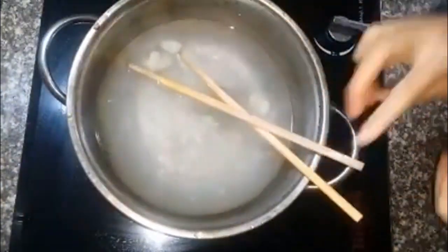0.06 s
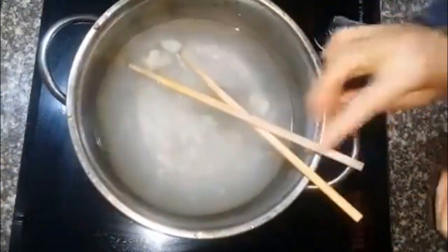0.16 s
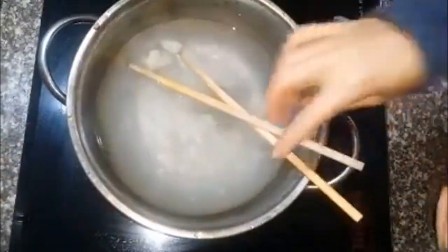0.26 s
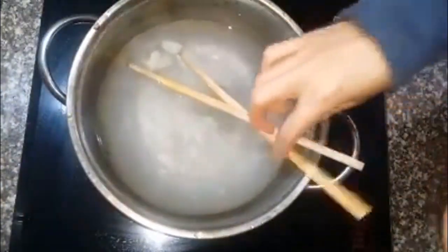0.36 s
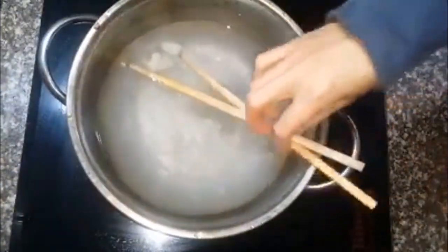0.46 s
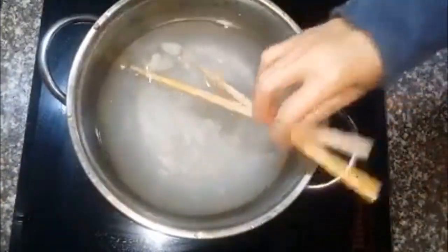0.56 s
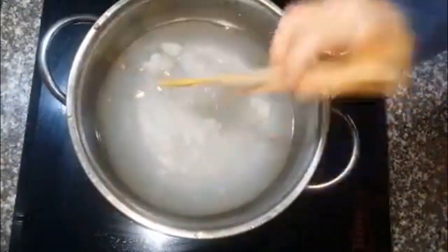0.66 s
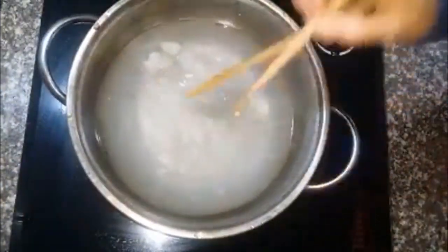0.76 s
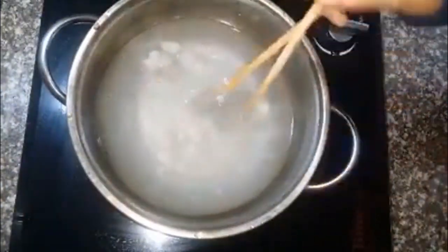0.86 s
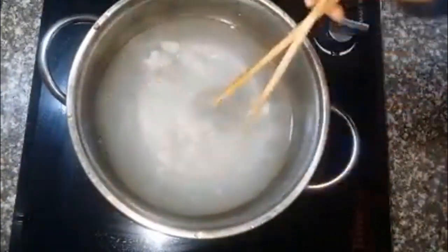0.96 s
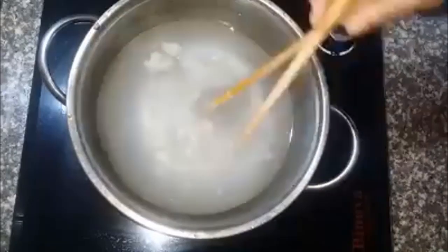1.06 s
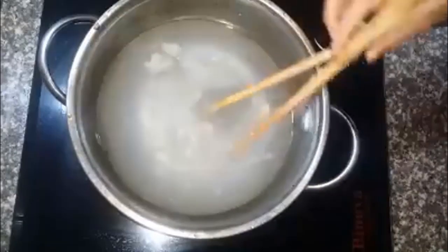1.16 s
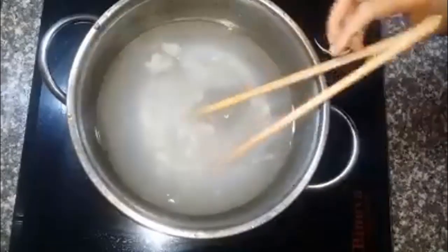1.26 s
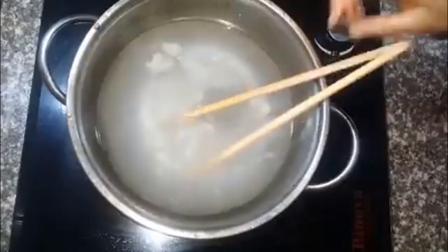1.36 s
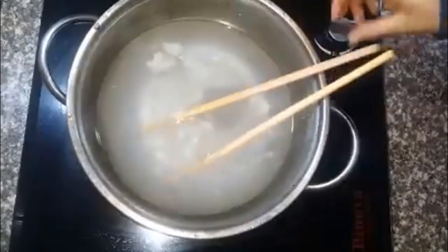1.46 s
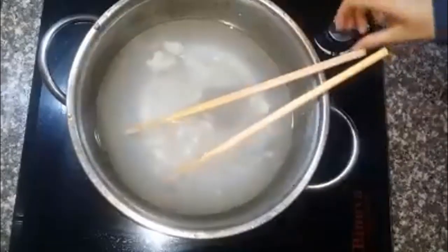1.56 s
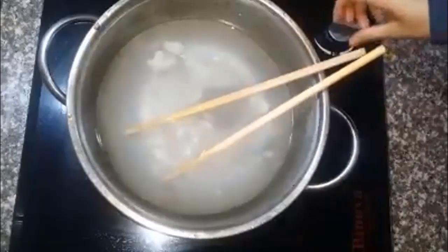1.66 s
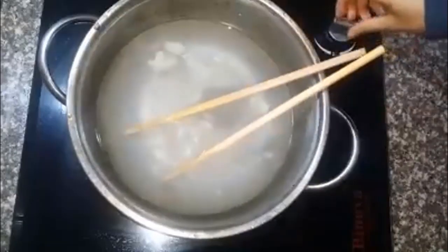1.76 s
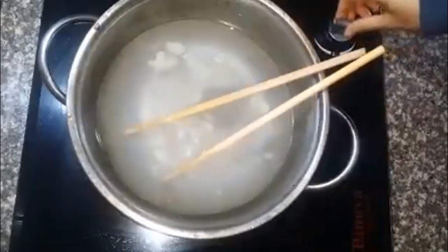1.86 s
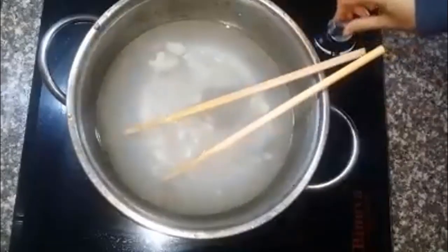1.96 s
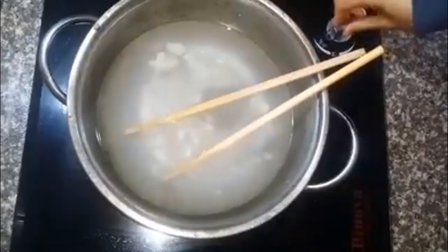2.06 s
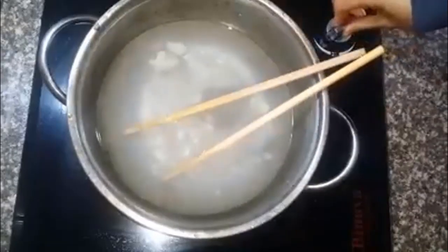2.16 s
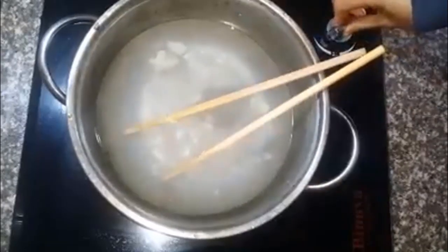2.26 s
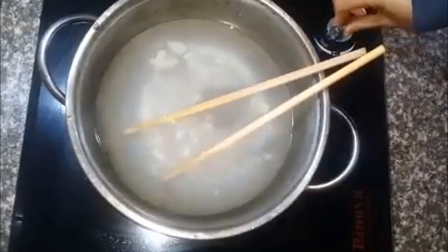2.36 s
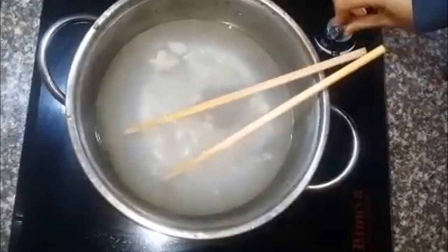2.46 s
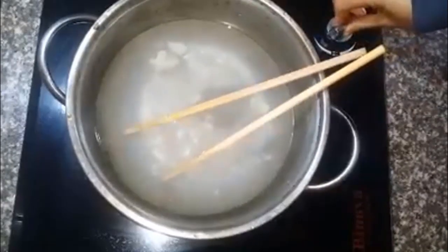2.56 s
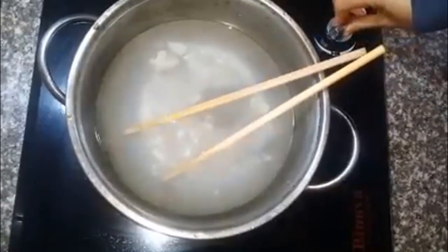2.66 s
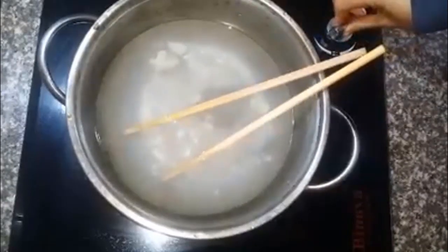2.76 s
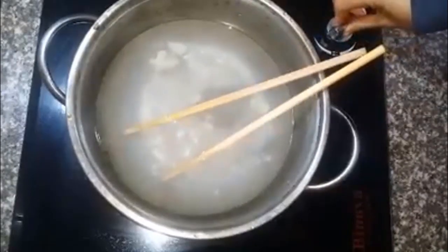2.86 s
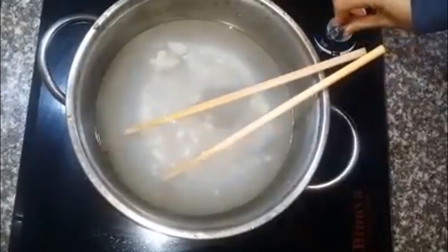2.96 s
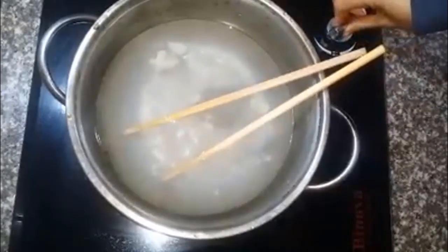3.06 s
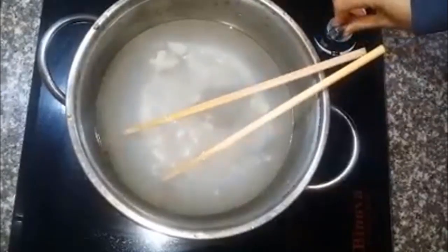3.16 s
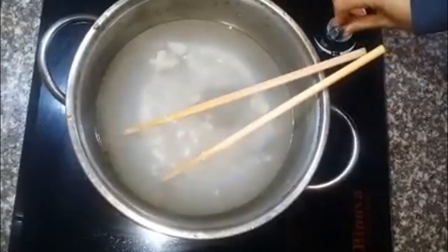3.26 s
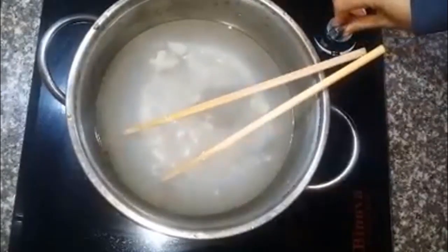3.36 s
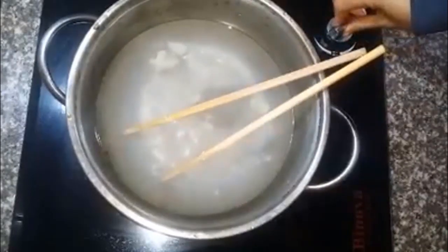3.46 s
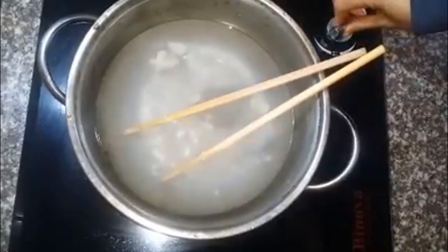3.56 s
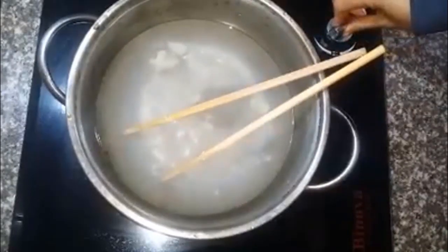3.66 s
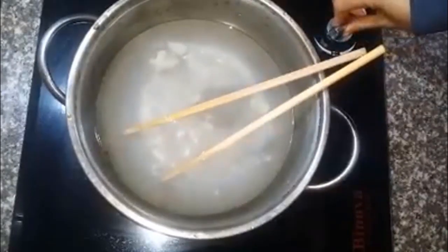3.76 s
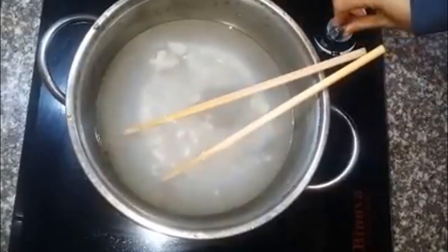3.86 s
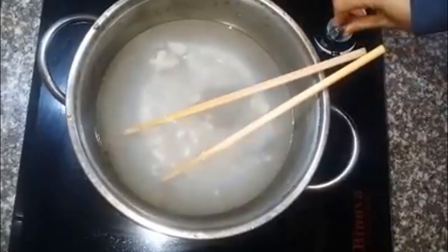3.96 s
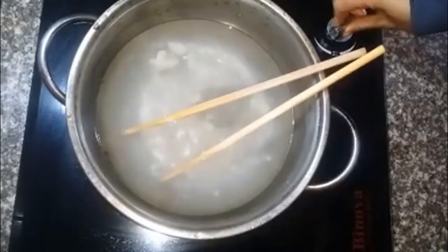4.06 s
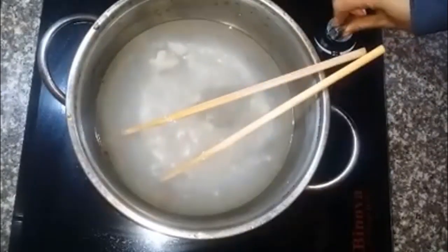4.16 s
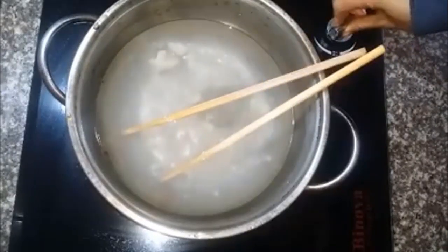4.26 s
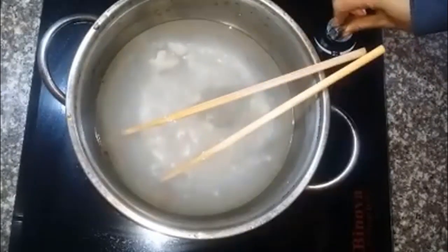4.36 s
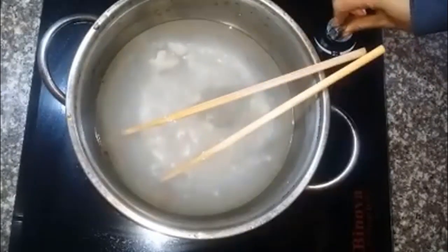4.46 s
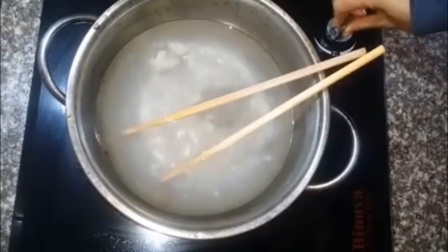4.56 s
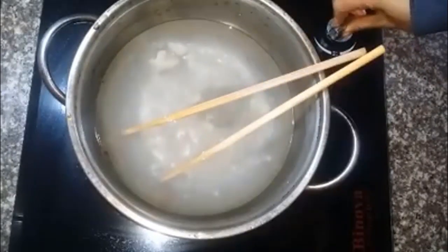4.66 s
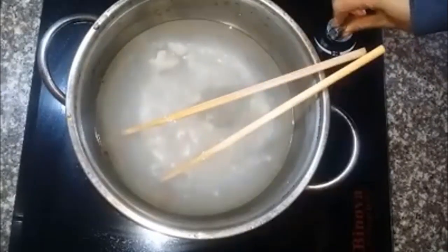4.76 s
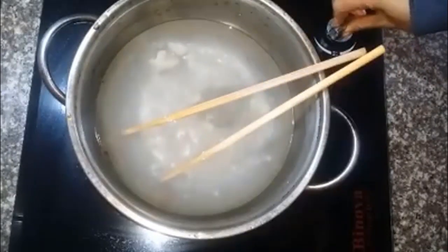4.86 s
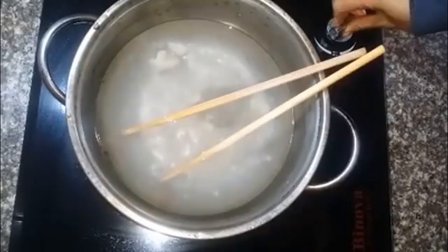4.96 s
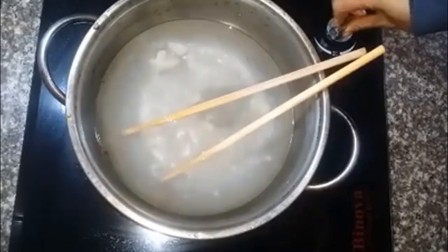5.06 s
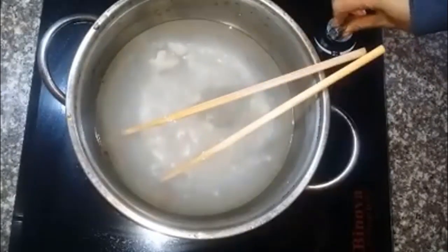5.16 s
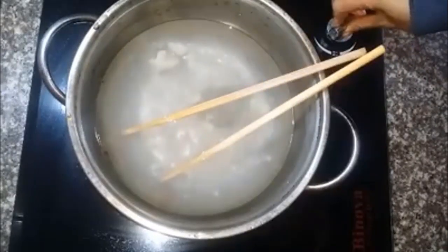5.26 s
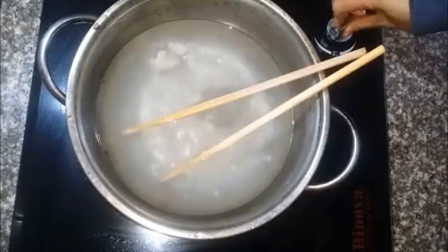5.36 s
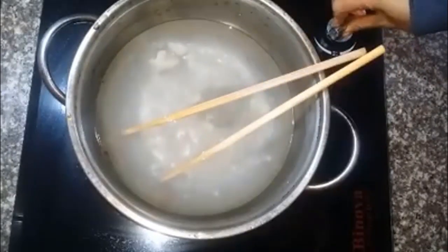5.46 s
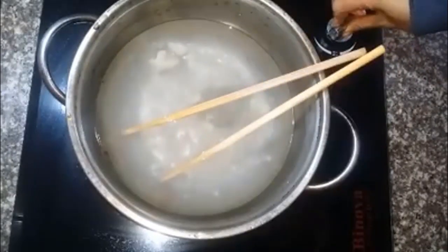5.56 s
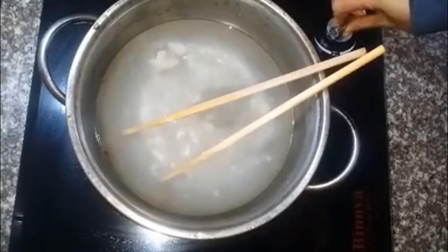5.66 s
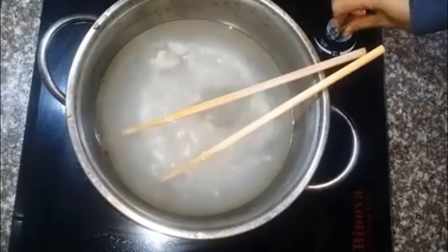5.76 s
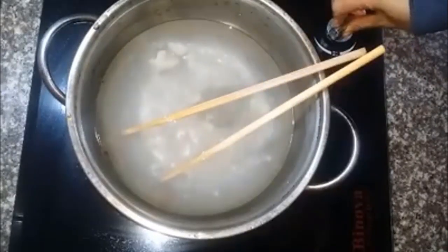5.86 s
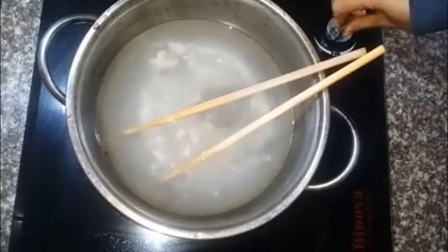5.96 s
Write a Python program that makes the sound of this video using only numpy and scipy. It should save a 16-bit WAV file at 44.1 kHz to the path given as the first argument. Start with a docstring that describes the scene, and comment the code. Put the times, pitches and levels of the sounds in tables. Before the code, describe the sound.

Brief wooden clatter with a metallic ring from a pot rim, followed by sharp, steady electric sparking in a quiet home kitchen.

```python
"""Chopsticks on a pot, then a gas hob's igniter

Wooden chopsticks lift out of a steel pot of water, knock together and drop on its rim: cracks plus decaying modes.
The hob's knob is pushed (noise through panel modes); sparks, about twelve a second, crack, echo and reverberate.
Hands and steps shake the worktop (modes, shaped noise); under it a low sine hum, house murmur and treble hiss."""
import sys
import numpy as np
from scipy import signal
from scipy.fft import rfft, irfft
from scipy.io import wavfile
from scipy.ndimage import uniform_filter1d

SR = 44100
rng = np.random.default_rng(int(sys.argv[2]) if len(sys.argv) > 2 else 0)


def write(x):
    x = np.atleast_2d(x).T
    wavfile.write(sys.argv[1], SR, np.round(np.clip(x, -1, 1) * 32767).astype(np.int16))


N = 264319
T = np.arange(N) / SR  # s
PORTS_HZ = 606  # the two channels are nearly alike below this
PORT_LAG_SAMPLES = 14  # the burner reaches the right channel later
GRIP_DB_S, RELEASE_DB_S = 507, 111  # rise and fall of a hand's push

# Spectrum of the building's response: f/Hz, level/dB
BUILDING_SPECTRUM = [(12, -41.5), (20, 7), (55, -4.5), (140, 5.5), (226, -2.5), (631, -11.5), (700, -11),
                     (910, -44), (1540, -120)]
# Spectrum of sloshing water, also of the steps' tail: f/Hz, level/dB
SLOSH_SPECTRUM = [(120, -33.5), (200, -1.5), (244, 2.5), (291, -6), (452, -5.5), (575, -11.5), (823, -6),
                  (1700, -38.5), (2210, -98), (3740, -120)]


def undb(db):
    """Gain of a level in dB."""
    return 10 ** (np.asarray(db) / 20)


def unit(x):
    """Scaled to rms 1."""
    return x / np.sqrt(np.mean(x ** 2))


def butter2(x, hz, kind):
    """Second-order Butterworth filter."""
    return signal.sosfilt(signal.butter(2, hz, kind, fs=SR, output="sos"), x)


def tint(x, spectrum, size=4096):
    """Minimum-phase filter through (Hz, dB) points, by folded cepstrum; response of unit energy."""
    hz, db = np.transpose(spectrum)
    grid_hz = np.maximum(np.arange(size // 2 + 1) * SR / size, 1)
    ceps = irfft(np.log(undb(np.interp(np.log(grid_hz), np.log(hz), db))))
    ceps[1:size // 2] *= 2
    ceps[size // 2 + 1:] = 0
    response = irfft(np.exp(rfft(ceps)))
    response = response / np.sqrt(np.sum(response ** 2))
    return signal.fftconvolve(x, response[None], axes=1)[:, :N]


def noise(alike, patchy_db, lag=0):
    """Stereo noise sharing a part (alike, 0 to 1); its level varies in patches of time and pitch."""
    mid, side = rng.standard_normal((2, N))
    side = butter2(side, PORTS_HZ, "high")
    alike = np.clip(alike, 0, 1)
    shared = np.sqrt(1 + alike) * np.array([mid, np.roll(mid, lag)])
    opposed = np.sqrt(1 - alike) * side * np.array([[1], [-1]])
    cells = signal.stft((shared + opposed) / np.sqrt(2), nperseg=512)[2]
    patches = uniform_filter1d(rng.standard_normal(cells.shape[1:]), size=4, axis=0)
    patches = uniform_filter1d(patches, size=3, axis=1)
    return signal.istft(cells * undb(patchy_db * unit(patches)), nperseg=512)[1][:, :N]


def flicker(rate_hz, depth_db):
    """Gain that wanders about rate_hz times a second: smoothed random steps in dB."""
    hold = int(SR / rate_hz)
    steps = np.repeat(rng.standard_normal(N // 100), hold)[:N]
    return undb(depth_db * uniform_filter1d(steps, hold))


def fade(t60_s):
    """Exponential envelope, 60 dB down after t60_s; cut at t60_s or 1.5 s."""
    return np.exp(-np.log(1000) * T[:int(min(t60_s, 1.5) * SR)] / t60_s)


def curve(s, db):
    """Gain along a level curve, -120 dB outside it."""
    return undb(np.interp(T, s, db, left=-120, right=-120))


def swell(s, hold_s, db, rise_db_s, sag_db_s, fall_db_s):
    """Gain that rises to its level at s, sags while held, then falls."""
    rise_db = rise_db_s * np.maximum(s - T, 0)
    sag_db = sag_db_s * np.clip(T - s, 0, hold_s)
    fall_db = fall_db_s * np.maximum(T - s - hold_s, 0)
    return undb(db - rise_db - sag_db - fall_db)


def blows(s, db, pan_db=0.):
    """One impulse per event and channel; pan_db is left minus right."""
    out = np.zeros((2, N))
    out[:, (np.asarray(s) * SR).astype(int)] = undb(db + np.array([[.5], [-.5]]) * pan_db)
    return out


def through(x, response):
    """Each channel convolved with a response."""
    return signal.fftconvolve(x, np.atleast_2d(response), axes=1)[:, :N]


def ring(x, modes, spread, damp=1.0):
    """Decaying sine modes; channel phases differ randomly (spread/rad), less at low pitch."""
    hz, db, t60_s = np.transpose(modes)[:, :, None]
    t = T[:SR]
    lean = spread * np.minimum(hz / PORTS_HZ, 1) * rng.standard_normal(hz.shape)
    phase = lean * np.array([.5, -.5])[:, None, None]
    decay = undb(db - 60 * t / (damp * t60_s))
    return through(x, np.sum(decay * np.sin(2 * np.pi * hz * t + phase), axis=1))


def power_decay(x, envelope):
    """Amplitude envelope whose power is the summed decay of all blows."""
    return np.sqrt(np.maximum(through(x ** 2, envelope ** 2), 0))


def tail(x, t60_s, alike, patchy_db, lag=0):
    """Reverberation: noise under the decaying power of the blows."""
    return power_decay(x, fade(t60_s)) * noise(alike, patchy_db, lag)


def kitchen():
    """A wavering sine hum of sinking pitch, filtered-noise murmur of the building and patchy hiss."""
    # Hum level: t/s, level/dB
    hum_level = [(2.7, -61), (2.85, -54.5), (3.598, -56.5), (4.181, -49.5), (4.91, -48.5), (5.3, -59)]
    # Murmur level: t/s, level/dB
    murmur_level = [(1.9, -54), (2.5, -57), (3.7, -49), (4.95, -50), (5.99, -52.5)]
    # Treble rustle of hands and kitchen: t/s, level/dB
    hiss_level = [(0.0, -56), (0.07, -60.5), (0.38, -74), (0.56, -71), (0.59, -58), (0.66, -65),
                  (1.136, -66), (1.33, -95), (1.85, -70.5), (2.16, -54.5), (2.3, -64)]
    # Its spectrum: f/Hz, level/dB
    hiss_spectrum = [(590, -43.5), (1000, 1), (1420, -4.5), (2440, -6), (3500, -22), (3880, -9),
                     (5420, -10), (6400, -11.5), (7230, -10.5), (8230, -8.5), (9200, -48.5), (12000, -61),
                     (20200, -120)]
    hum_hz, hum_sag_hz_s = 130, 1.261  # pitch at the first level point, fall per second
    s, db = np.transpose(hum_level)
    hz = hum_hz - hum_sag_hz_s * (T - s[0])
    level = np.sqrt(2) * curve(s, db) * flicker(8.7, 1.3)
    hum = uniform_filter1d(level, size=2000) * np.sin(2 * np.pi * np.cumsum(hz) / SR)
    murmur = unit(tint(noise(1.0, 3.4), BUILDING_SPECTRUM)) * curve(*np.transpose(murmur_level))
    hiss = unit(tint(noise(0.033, 4.0), hiss_spectrum)) * curve(*np.transpose(hiss_level))
    return hum + murmur + hiss


def footsteps():
    """Twice-softened impacts ring floor modes; a noise tail and the building boom on."""
    # Steps in the house: t/s, level/dB
    step_events = [(3.281, -47), (3.766, -37.5), (4.344, -40.5), (4.406, -38.5)]
    # Floor modes: f/Hz, level/dB, t60/s
    boards = [(99, 2, 1.1), (114, -4, .4), (175, -1, .4), (240, -14, .35), (330, -8, .4), (400, -14, .3)]
    push = np.hanning(150) / 75  # soft contact, 3.4 ms
    step = blows(*np.transpose(step_events))
    floor = ring(through(through(step, push), push), boards, spread=.02)
    scuff = undb(-11) * tint(tail(step, 1.0, 0.71, 5.2), SLOSH_SPECTRUM)
    boom = undb(-7.5) * tint(tail(step, 1.5, 1.0, 1.8), BUILDING_SPECTRUM)
    return floor + scuff + boom


def worktop_thuds():
    """Soft blows ring the cabinet's low modes."""
    # Dull thuds: t/s, level/dB before the modes
    thud_events = [(0.02, -31), (0.618, -40), (0.669, -26.5), (1.35, -30), (1.436, -23)]
    # Cabinet modes: f/Hz, level/dB, t60/s
    cabinet = [(76.8, -10.5, 1), (102.7, -14.5, 0.81), (150.4, 4, 0.54), (166.8, 3, 0.35), (234, 4.5, 0.15),
               (332, 0, 0.11), (440, 6, 0.2)]
    push = np.hanning(150) / 75  # soft contact, 3.4 ms
    return undb(-14.5) * ring(through(blows(*np.transpose(thud_events)), push), cabinet, spread=.02)


def touch(column, still_db):
    """Gain from the summed power of all touches over a faint rest level."""
    # Hands on pot, worktop and knob: t/s, hold/s, rumble/dB, slosh/dB
    touches = [(0.01, 0.0035, -35.5, -48.5), (0.625, 0.09, -42.5, -44.5), (0.706, 0.16, -36.5, -48),
               (0.977, 0.1, -54.5, -61.5), (1.113, 0.13, -49.5, -53.5), (1.37, 0.034, -49.5, -43.5),
               (1.453, 0.092, -44.5, -41), (1.568, 0.2, -40.5, -45.5), (2.04, 0.2, -50, -52),
               (2.295, 0.25, -52, -71)]
    power = undb(still_db) ** 2
    for row in touches:
        power = power + swell(row[0], row[1], row[column], GRIP_DB_S, 27, RELEASE_DB_S) ** 2
    return np.sqrt(power)


def handling():
    """Each touch swells a low noise rumble and the uneven grains of sloshing water."""
    # Rumble spectrum: f/Hz, level/dB
    rumble_spectrum = [(12, -68.5), (20, -14), (38, -18.5), (58, -6), (76, 11), (109, 1), (156, 0),
                       (228, -7), (292, -14.5), (400, -10), (520, -26), (880, -120)]
    rumble = unit(tint(noise(0.85, 0.37), rumble_spectrum)) * touch(column=2, still_db=-64)
    grains = noise(.9, 1.5) * flicker(60, 2.5)
    slosh = unit(tint(grains, SLOSH_SPECTRUM)) * touch(column=3, still_db=-75)
    return rumble + slosh


def knob():
    """Friction in the valve, as flickering noise, makes the hob's panel drone briefly."""
    # The knob is pushed down and turned: t/s, hold/s, level/dB at the start of the hold
    pushes = [(2.027, 0.12, -50), (2.287, 0.012, -51)]
    # Panel modes: f/Hz, level/dB, t60/s
    hob_panel = [(165, -1, 0.049), (235, -0.5, 0.17), (266, -8, 0.079)]
    sag_db_s = -56  # negative: grows as the push gets firmer
    drone = unit(ring(noise(0.93, 1.1) * flicker(40, 1.5), hob_panel, spread=0.043))
    return drone * sum(swell(*row, GRIP_DB_S, sag_db_s, RELEASE_DB_S) for row in pushes)


def rim_rattle(pot_modes, room_spectrum):
    """Chopsticks trembling on the rim: noise drives the damped pot modes and buzzes against them."""
    buzz = noise(0.96, 4.5) * flicker(140, 2.5)
    damped_ring = unit(ring(buzz, pot_modes, spread=2.45, damp=.45))  # wood on the rim shortens t60
    plain_buzz = undb(-10) * unit(tint(buzz, room_spectrum))
    level = swell(1.408, 0.36, -31, rise_db_s=484, sag_db_s=37.5, fall_db_s=284)
    return (damped_ring + plain_buzz) * level


def contact(s, db, pan_db):
    """An impulse with a short noise burst after it."""
    blow = blows(s, db, pan_db)
    return undb(-7) * tail(blow, .022, .7, 2) + blow


def chopsticks():
    """Each knock is a crack, the modes of wood and pot, and a room tail; a rim rattle joins in."""
    # Knocks, last the knob's catch: t/s, level/dB, left minus right/dB,
    # then relative to level: pot ring/dB, wood body/dB, room/dB, treble/dB
    knocks = [(0.59, -49.5, -5, -28, 5, -3.5, 5), (.63, -38, 6, -16.5, 2, -41, -11),
              (.667, -32.5, 4, -29, 10, -48, -31), (0.804, -36, 3, -29, -27, -16.5, 7.5),
              (.885, -54.5, -3, -13, 29, -24, -2), (1.019, -57.5, 2, -16.5, 10, 1.5, 3),
              (1.163, -26.5, -1, -43, 6, -20, 4.5), (1.342, -39, 9, -34, 3, -44, -7.5),
              (1.346, -22.5, 1, -26.5, -10, -42, -16), (1.362, -34.5, 7, -42, 5.5, -44, -20),
              (1.376, -38, 4, -29, 3.5, -44, 1), (1.381, -14, 15, -24, -20, -33, -3),
              (1.3825, -12.5, 7, -22.5, -23.5, -32, 5), (1.385, -12, -6, -17.5, -32, -17.5, -2.5),
              (1.395, -32, 0, -31.5, -25, -32, 17), (1.508, -34, 3, -21, -8, -4, 8),
              (1.521, -19.5, -5, -39, 1, -24, -6.5), (1.678, -17.5, 0.5, -32, -0.5, -26.5, -5),
              (1.685, -29.5, 10, -27, -16, -36, 2), (2.111, -38, -6, -42, -7, -32, -1)]
    # Pot modes: f/Hz, level/dB, t60/s
    pot_modes = [(385.6, -7, 0.5), (753, -16.5, 0.99), (808, -11.5, 1), (963, -10.5, 1), (1030, -10, 0.5),
                 (1027, -19, 0.71), (1162, -7, 0.35), (1403, -1, 0.24), (1423, -15, 0.39), (1837, 1, 0.21),
                 (1870, -6.5, 0.43), (1918, -10, 0.38), (2540, -9.5, 0.37), (2600, -25, 0.3),
                 (2700, -7.5, 0.24), (3160, -22, 0.36), (3040, -17, 1), (3660, -9.5, 0.35),
                 (3678, -9, 0.63), (3880, -27, 0.22), (4520, -25, 0.21), (4470, -22, 0.33),
                 (4750, -12.5, 0.34), (5050, -12, 0.39), (5610, -9.5, 0.26), (5733, -18.5, 0.35),
                 (6040, -9, .3), (6440, -17, 1), (6460, -15, 0.51), (6800, -7.5, 0.31), (7220, 2.5, 0.1),
                 (7500, -13, 0.27), (8000, -5.5, 0.13), (8100, -9.5, 0.24), (8000, -15, 0.29),
                 (8400, -22, .35)]
    # Wood modes: f/Hz, level/dB, t60/s
    wood_modes = [(662, -22, 0.19), (1040, -26.5, 0.14), (1297, -31, 0.074), (2360, -40, 0.02),
                  (3060, -43, 0.032), (5340, -31.5, 0.15)]
    # Crack spectrum: f/Hz, level/dB
    crack_spectrum = [(180, -32), (400, -22), (900, -1), (1900, -5.5), (2800, 6.5), (4000, 2.5),
                      (7000, 4.5), (8650, 9), (9000, -23.5), (20200, -120)]
    # Room spectrum: f/Hz, level/dB
    room_spectrum = [(180, -24), (300, -38), (388, -5), (563, -21.5), (818, -8.5), (1580, -13.5),
                     (1880, -6.5), (2290, -42), (2500, 0), (2950, -5), (3220, 0.5), (3420, -36), (3600, 0),
                     (5350, -4.5), (7110, -1), (8600, 0.5), (8900, -62), (12000, -105.5), (20200, -120)]
    treble_hz = 4170  # treble/dB acts above this; softer contacts are duller
    faster_fade_s, faster_fade_db_s = 1.76, 160  # from here the ring fades faster, for 0.3 s
    s, db, pan_db, pot_db, wood_db, room_db, treble_db = np.transpose(knocks)
    body = butter2(contact(s, db, pan_db), treble_hz, "low")
    treble = butter2(contact(s, db + treble_db, pan_db), treble_hz, "high")
    crack = tint(body + treble, crack_spectrum)
    room = tint(tail(blows(s, db + room_db), 0.39, 0.099, patchy_db=3), room_spectrum)
    pot = ring(blows(s, db + pot_db), pot_modes, spread=0.93)
    pot = pot * flicker(40.16, 5.2)  # the ring's level wavers irregularly
    pot = pot * undb(-faster_fade_db_s * np.clip(T - faster_fade_s, 0, .3))
    wood = ring(blows(s, db + wood_db, pan_db), wood_modes, spread=1.0)
    return crack + room + pot + wood + rim_rattle(pot_modes, room_spectrum)


def sparks():
    """Time, level, pan and snap level of every spark; pan and snap scatter at random."""
    # Igniter sparks: t/s (0.2 ms is added), level/dB before the filters
    spark_events = [(2.172, -18.5), (2.2548, -16.5), (2.34, -14), (2.4241, -14), (2.5087, -14),
                    (2.5942, -14), (2.6787, -14.5), (2.7634, -15), (2.8481, -13.5), (2.934, -14),
                    (3.0192, -12.5), (3.1045, -13), (3.189, -12), (3.2752, -11), (3.36, -12.5),
                    (3.4464, -10.5), (3.5311, -13), (3.616, -11.5), (3.7014, -12.5), (3.7881, -12.5),
                    (3.8736, -12.5), (3.9597, -13), (4.0447, -11), (4.1304, -12.5), (4.2152, -13.5),
                    (4.3001, -11.5), (4.3868, -11.5), (4.4721, -12), (4.5588, -12.5), (4.6435, -12.5),
                    (4.7299, -13.5), (4.8158, -13.5), (4.9023, -12.5), (4.987, -15), (5.0721, -11.5),
                    (5.1576, -13), (5.2443, -13.5), (5.3298, -14), (5.4161, -12.5), (5.5015, -13),
                    (5.587, -13), (5.6728, -14), (5.7586, -13), (5.8454, -14.5), (5.9305, -14)]
    delay_s, pan_scatter_db = .0002, 0.13
    snap_db, snap_scatter_db = -23.5, 1.5  # low snap relative to the spark
    snap_full_s, snap_fade_in_db_s = 2.9, 8  # weaker in the first sparks
    s, db = np.transpose(spark_events)
    pan_chance, snap_chance = rng.standard_normal((len(s), 2)).T
    early_db = snap_fade_in_db_s * np.maximum(snap_full_s - s, 0)
    snap_db = snap_db + snap_scatter_db * snap_chance - early_db
    return s + delay_s, db, pan_scatter_db * pan_chance, snap_db


def walls():
    """One response of decaying band-noise echoes, the same for every spark."""
    # Later echoes off walls and cupboards: delay/ms, centre f/Hz, width/Hz, level/dB, t60/s
    wall_echoes = [(5.5, 1400, 600, -20, .04), (15.5, 750, 500, -20, .035), (17, 3350, 1000, -28, .1),
                   (29, 1400, 600, -22, .05), (30, 3400, 1100, -28, .1), (33, 750, 500, -29, .04),
                   (38, 5400, 2500, -30, .15), (43.5, 1400, 600, -21, .04), (40, 2400, 700, -35, .15),
                   (44, 3400, 1100, -28, .06), (51.5, 1450, 600, -23, .07), (52, 3400, 1100, -27, .07)]
    out = np.zeros((2, int(.3 * SR)))
    for ms, hz, width_hz, db, t60_s in wall_echoes:
        decay = fade(t60_s)[:int(.2 * SR)]
        mid, side = rng.standard_normal((2, len(decay)))
        grain = (mid + 0.89 * side * np.array([[1], [-1]])) * decay
        burst = butter2(grain, [hz - width_hz / 2, hz + width_hz / 2], "band")
        start = int(ms * SR / 1000)
        out[:, start:start + len(decay)] += undb(db) * burst
    return out


def close_echoes():
    """Impulse response of the nearest reflections, later in the right channel."""
    # Reflections off pot base and hob: delay/ms, left/dB, right/dB
    near_echoes = [(0, -8, -3), (.29, 0, 0), (.82, -3, -8), (1.18, -3, -8), (1.65, -18, -10),
                   (2.6, -15, -14), (2.97, -11, -20), (3.45, -18, -20), (3.85, -16, -22)]
    out = np.zeros((2, 400))
    for ms, left_db, right_db in near_echoes:
        start = int(ms * SR / 1000)
        out[0, start] += undb(left_db)
        out[1, start + PORT_LAG_SAMPLES] += undb(right_db)
    return out


def spark_room(spark):
    """The kitchen's tail: part fresh noise, part one noise response repeated by every spark."""
    # Spectrum of the kitchen's answer: f/Hz, level/dB
    room_spectrum = [(180, -36), (300, -43.5), (904, -12), (1290, -11), (1430, -20.5), (1900, -13),
                     (2450, -18), (3010, -11.5), (3500, -22), (3900, -7.5), (4760, -9), (6070, -7),
                     (7110, -8.5), (8090, -3.5), (8690, -8.5), (9200, -53.5), (12000, -55), (20200, -120)]
    hush_s, hush_db_s = 0.086, 244.5  # the tail thins quickly after hush_s
    hush = fade(0.23)
    hush = hush * undb(-hush_db_s * np.clip(T[:len(hush)] - hush_s, 0, .04))
    sputter = noise(0.23, 4.0) * flicker(220, 2.4)
    fresh = power_decay(spark, hush) * sputter
    repeated = undb(-2) * through(spark, hush * sputter[:, :len(hush)])
    return tint(undb(-23.5) * (fresh + repeated), room_spectrum)


def igniter():
    """Each spark is a crack with close reflections, a blur under the pot, a low snap, echoes and a tail."""
    # Spectrum of a spark under the pot: f/Hz, level/dB
    crack_spectrum = [(180, -44), (300, -12.5), (641, -19), (917, -0.5), (1290, -27), (1410, -9.5),
                      (2290, -15), (2650, 2.5), (3030, 2), (3420, -7.5), (4250, -6.5), (4450, 4),
                      (4830, -8.5), (5620, 6.5), (6070, 5.5), (6700, 3), (7050, -7.5), (7500, 2),
                      (7900, 5.5), (8350, 14.5), (8690, 3.5), (9200, 10), (12000, -40.5), (20200, -120)]
    snap_modes = [(750, 5.0, 0.0086), (1457, -7.0, 0.069)]  # f/Hz, level/dB, t60/s
    s, db, pan_db, snap_db = sparks()
    spark = blows(s, db, pan_db)
    reflected = undb(9.5) * through(spark, close_echoes())
    # each spark has its own short noise burst after the crack
    burst = undb(-19) * tail(spark, .009, .8, 4.0, lag=PORT_LAG_SAMPLES)
    blur = undb(-13) * tail(spark, 0.047, 1.0, 6.7, lag=PORT_LAG_SAMPLES)
    blur = butter2(blur, 3800, "high")
    crack = tint(reflected + burst + blur, crack_spectrum)
    snap = ring(blows(s, db + snap_db, pan_db), snap_modes, spread=.2)
    echoes = through(spark, walls()) * flicker(60, 4.4)
    return crack + spark_room(spark) + snap + echoes


def scene():
    """Sum of all sources, background first."""
    background = kitchen() + footsteps()
    hands = worktop_thuds() + handling() + knob()
    return background + hands + chopsticks() + igniter()


def record(dry):
    """Rolls off the deepest bass, then cuts the top steeply with two zero-phase low-passes."""
    top_hz = 8750
    dry = signal.sosfilt(signal.butter(1, 45., "high", fs=SR, output="sos"), dry)
    dry = signal.sosfiltfilt(signal.cheby2(12, 9, top_hz + 20, fs=SR, output="sos"), dry)
    return signal.sosfiltfilt(signal.cheby2(12, 40, top_hz + 750, fs=SR, output="sos"), dry)


dry = scene()
out = record(dry)
write(out)
```